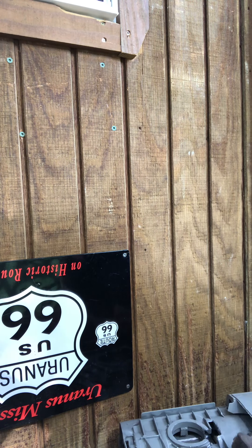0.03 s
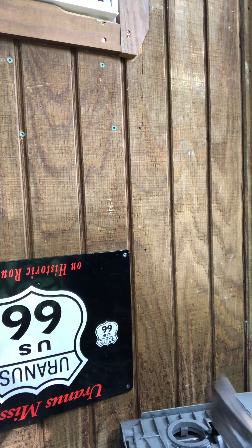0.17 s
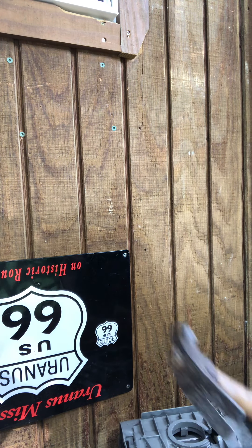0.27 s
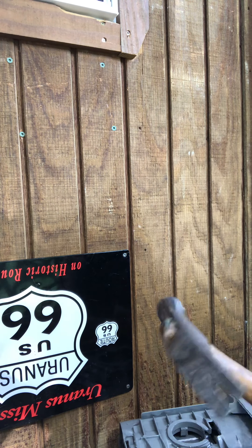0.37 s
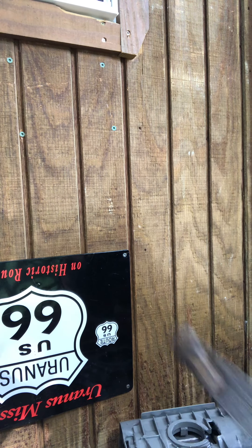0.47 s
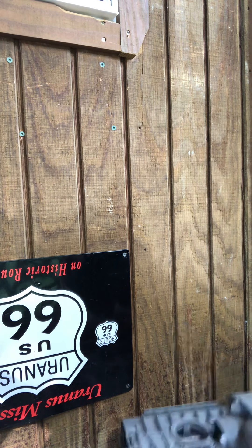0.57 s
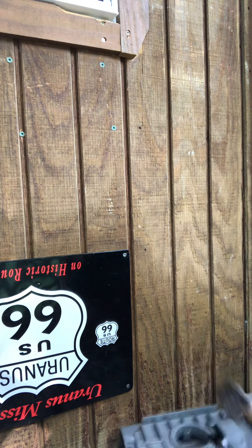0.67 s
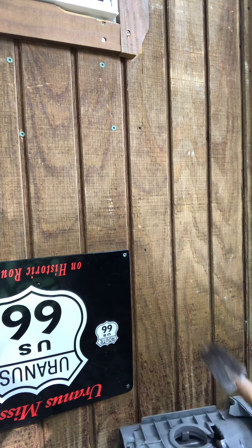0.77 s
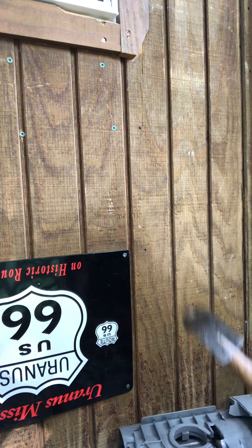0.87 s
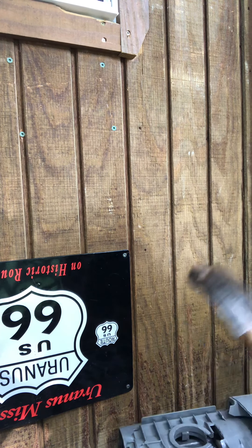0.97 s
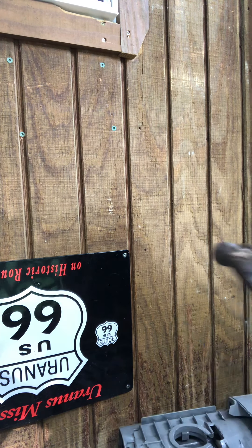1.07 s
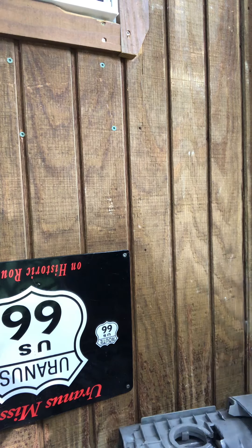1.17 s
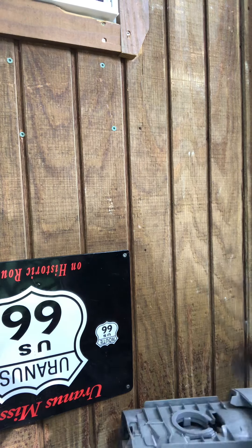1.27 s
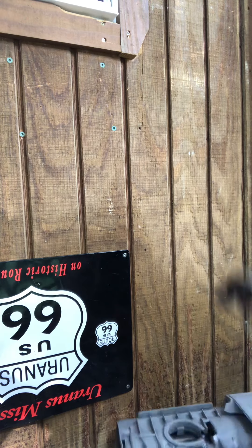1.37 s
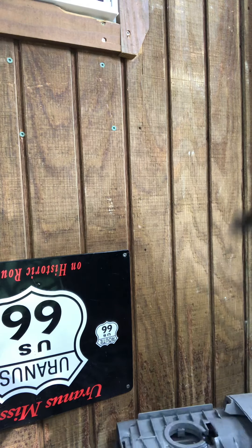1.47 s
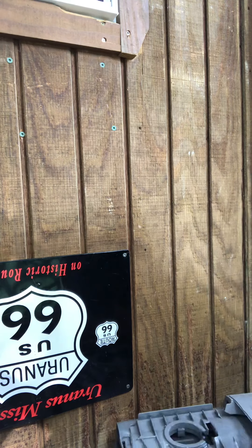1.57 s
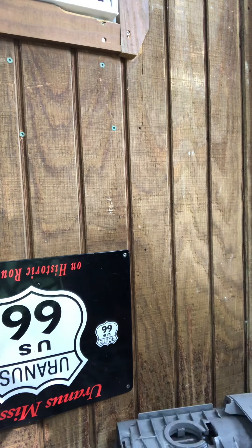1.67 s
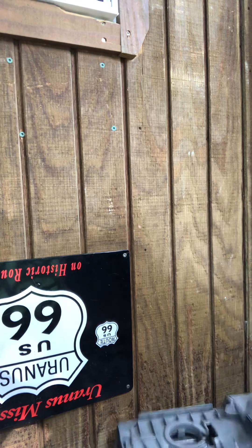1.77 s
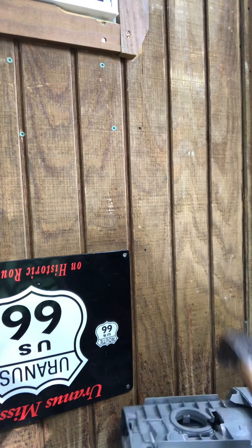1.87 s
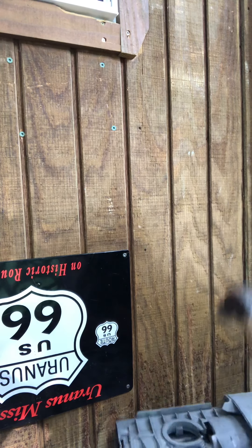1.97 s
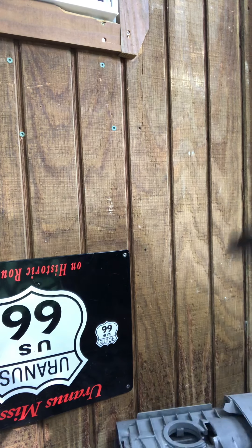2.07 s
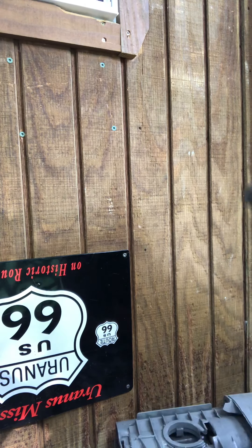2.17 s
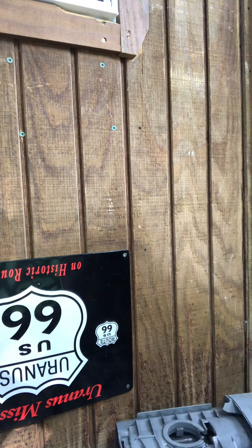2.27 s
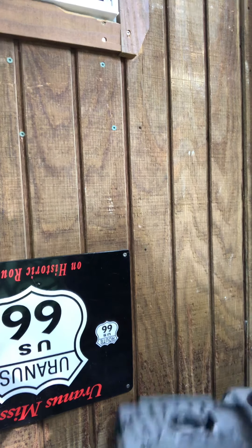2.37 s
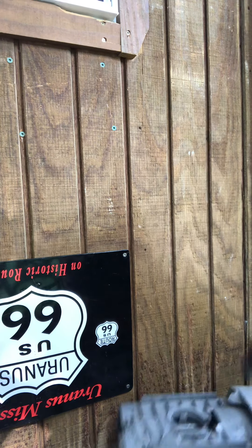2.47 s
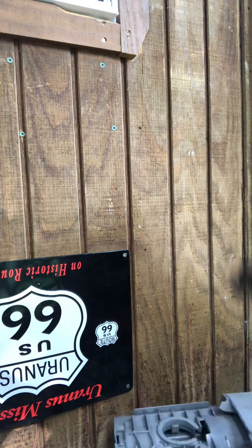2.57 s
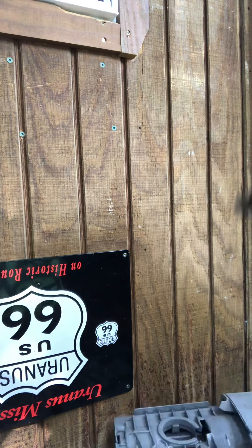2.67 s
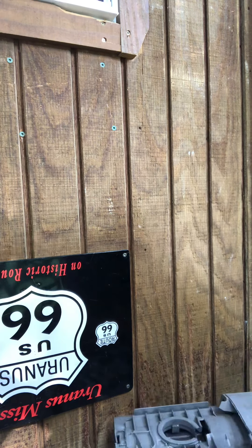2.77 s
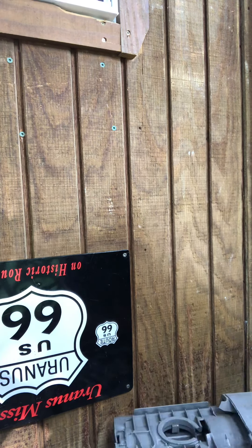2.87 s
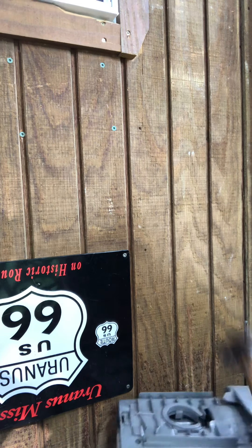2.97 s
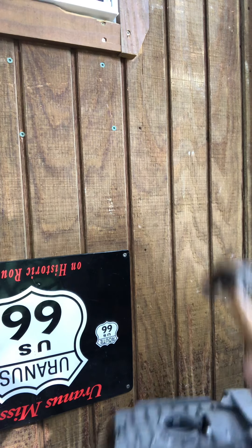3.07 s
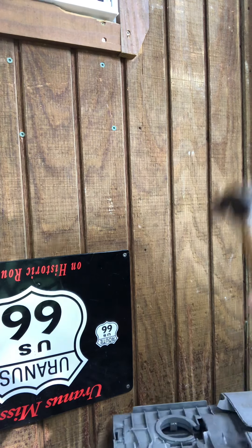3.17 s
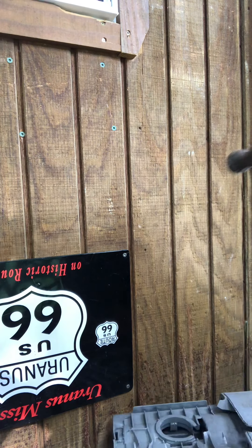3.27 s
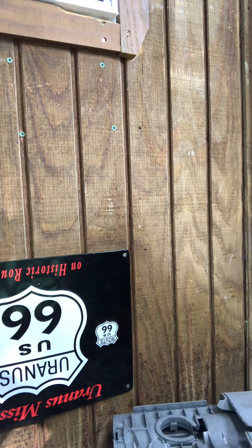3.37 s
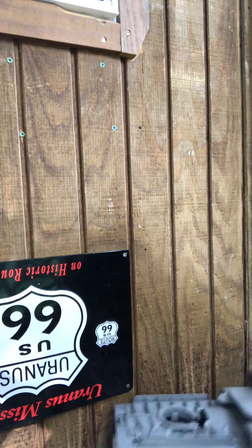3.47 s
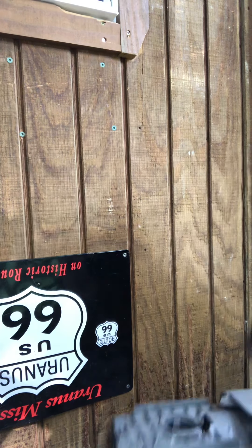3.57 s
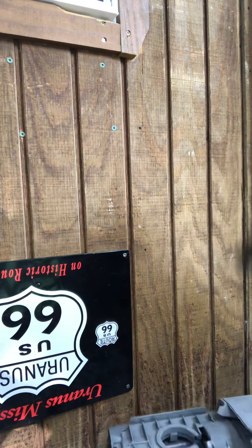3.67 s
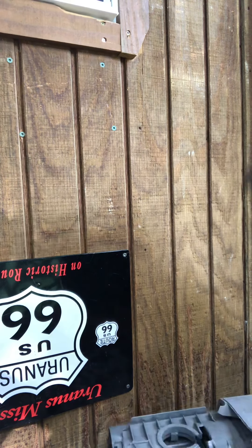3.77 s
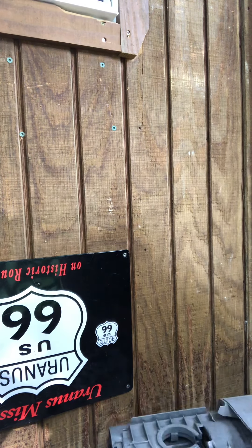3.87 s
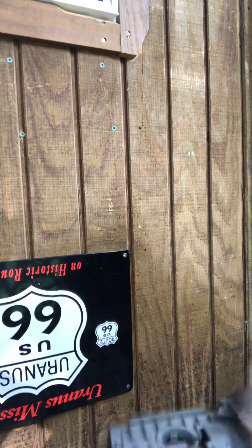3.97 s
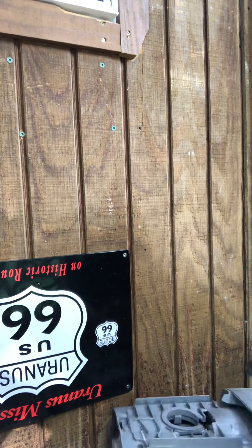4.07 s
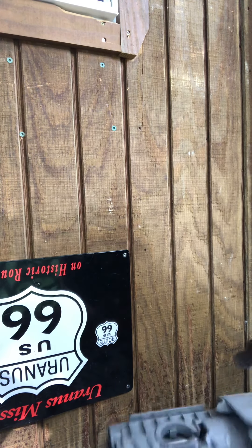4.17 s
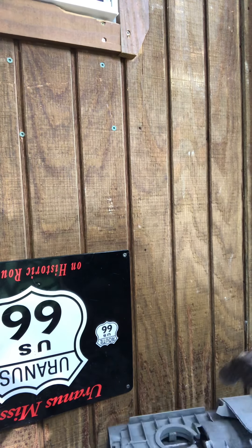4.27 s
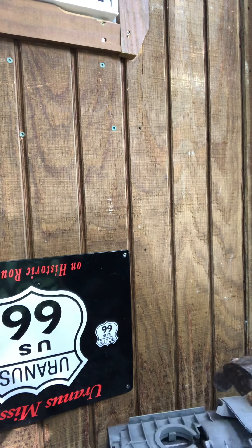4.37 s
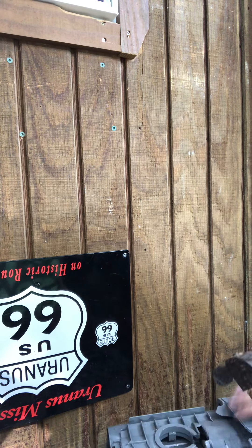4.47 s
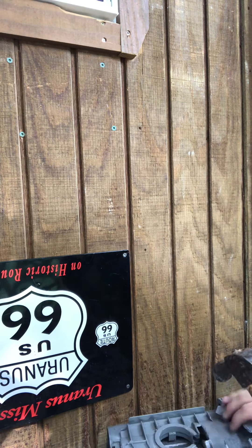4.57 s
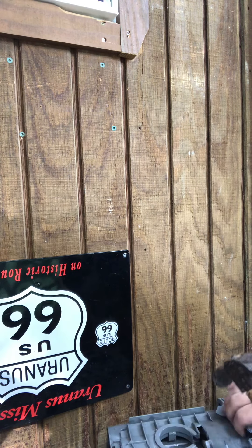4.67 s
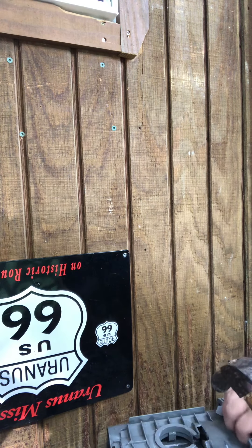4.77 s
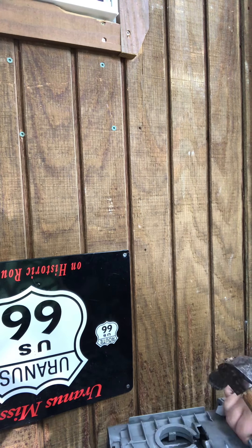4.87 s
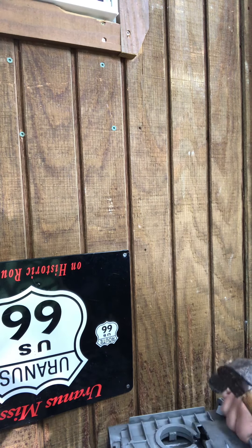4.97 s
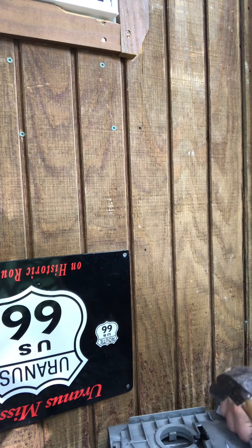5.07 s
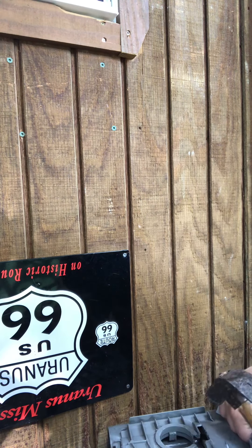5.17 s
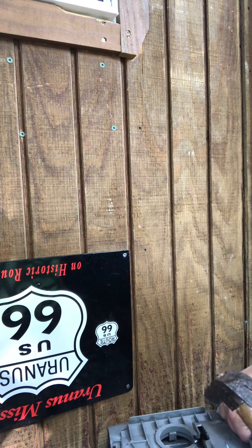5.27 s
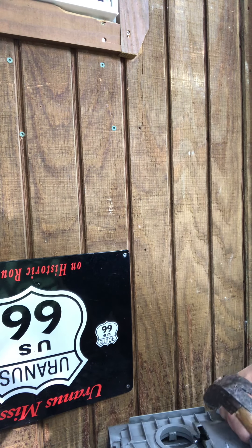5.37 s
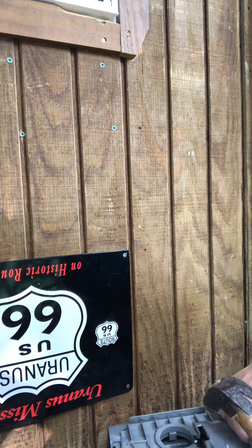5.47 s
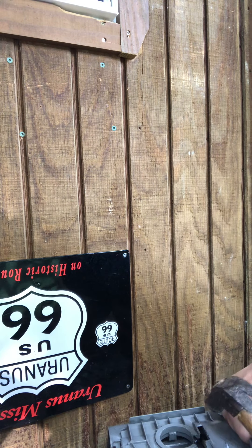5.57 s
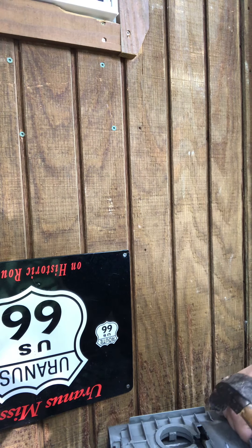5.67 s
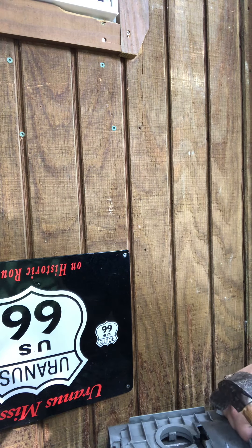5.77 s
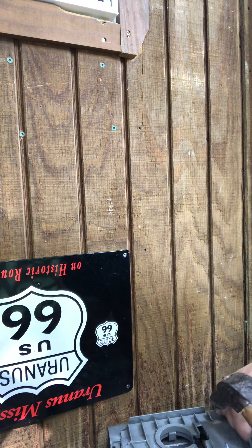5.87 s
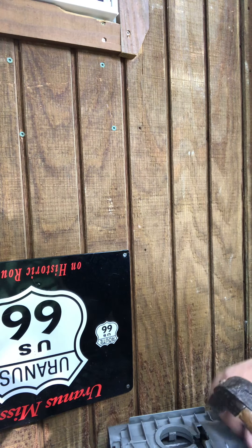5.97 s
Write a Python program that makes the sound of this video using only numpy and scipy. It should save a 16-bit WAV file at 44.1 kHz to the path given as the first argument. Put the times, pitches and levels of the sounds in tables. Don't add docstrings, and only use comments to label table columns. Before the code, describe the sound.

Faint road rumble and hiss open the scene, then loud steel-on-plastic blows begin, seven in fairly even rhythm. The hollow casing snaps, chatters on the boards and clatters down between hits, loose bits rattling inside. After the last, the hammer clinks down and quiet scuffs, taps and small squeaks follow. Dry, close phone microphone within arm's reach; the background dips under the blows, with tiny bird chirps and a distant motor.

```python
import sys
import numpy as np
from scipy import signal
from scipy.fft import rfft, irfft, next_fast_len
from scipy.io import wavfile
from scipy.ndimage import uniform_filter1d, map_coordinates

SR = 44100
rng = np.random.default_rng(int(sys.argv[2]) if len(sys.argv) > 2 else 0)


def wrap_up_sound(samples):
    columns = np.atleast_2d(samples).T
    tamed = np.clip(columns, -1, 1)
    steps = np.round(tamed * 32767).astype(np.int16)
    wavfile.write(sys.argv[1], SR, steps)


def amplitude_ratio(level_db):
    exponent = np.asarray(level_db, float) / 20
    return 10 ** exponent


N = 265923


def unit(x):
    return x / np.sqrt(np.mean(x ** 2) + 1e-20)


def along(points, hz):
    f, v = np.transpose(points)
    return np.interp(np.log(hz + 1), np.log(f + 1), v)


def curves(rows):
    s, *cols = np.transpose(rows)
    return [np.interp(np.arange(N) / SR, s, c) for c in cols]


def filtered(x, response):
    m = next_fast_len(len(x) + 4096)
    return irfft(rfft(x, m) * response(np.fft.rfftfreq(m, 1 / SR)), m)[:len(x)]


def colour(points):
    return lambda hz: amplitude_ratio(along(points, hz))


def modes(peaks):
    def response(f):
        total = 0
        for k, (centre, width, db) in enumerate(peaks):
            damping = 1j * f * width
            total = total + (-1) ** k * amplitude_ratio(db) * damping / (centre * centre - f * f + damping)
        return total
    return response


def noise_through(size, response):
    return unit(filtered(rng.standard_normal(size), response))


def grit(size, lumpy_db, rate):
    knots = rng.standard_normal(int(size * 2000 / SR) + 4)
    places = np.arange(size) * min(rate, 2000) / SR
    strength = amplitude_ratio(lumpy_db * map_coordinates(knots, [places], order=1))
    return unit(strength * rng.standard_normal(size))


def even(x, span):
    return x / np.sqrt(np.abs(uniform_filter1d(x ** 2, size=round(span * SR))) + 1e-12)


def add(out, s, piece):
    out[round(s * SR):][:len(piece)] += piece


# f/Hz, delay/ms
DELAY_MS = [(60, 25), (350, 7), (1000, 2.5), (2000, .4), (4000, 0)]


def late(hz, share=1):
    delay_s = share * along(DELAY_MS, hz) / 1000
    return np.exp(-2j * np.pi * np.cumsum(delay_s) * hz[1])


# f/Hz, width/Hz, level/dB
BODY = [(710, 60, 1), (860, 60, 2), (1090, 70, 5), (1390, 70, 3), (1580, 50, 3), (1890, 70, 3),
        (2390, 90, 2), (2820, 100, 2), (3250, 130, 1), (3750, 130, 0), (4250, 160, 0), (4920, 200, 1),
        (5750, 200, 0), (6800, 250, -1)]


def walls(tone, scatter_db):
    woken = [(c * rng.normal(1, .03), w, db - 3 + rng.normal(0, scatter_db)) for c, w, db in BODY]
    return lambda hz: colour(tone)(hz) * (1 + modes(woken)(hz))


# f/Hz, level/dB per Hz
RUMBLE = [(20, -40.5), (40, -16.5), (52, -3), (59, 6), (66, -9), (110, -13.5), (150, -12), (200, -55)]
ROAD = [(59, -26.5), (110, 1.5), (160, -1), (264, -1.5), (399, -13), (560, -15), (700, -13), (813, -8.5),
        (937, -9), (1060, -6), (1150, -10), (1300, -13.5), (2200, -21), (2860, -46.5), (4840, -120)]
HISS = [(880, -39), (1500, -15.5), (2160, -19), (2740, -15.5), (4970, -22.5), (6060, -28), (8000, -33.5),
        (15000, -46), (16200, -53)]
# level at full gain/dB, share of the gain change
STREET_LAYERS = [
    (-59, 0.2),
    (-39.5, 0.91),
    (-55, 0.7),
]
# depth/dB, lumps per s
STREET_LUMPS = [
    (2, 8),
    (.8, 30),
    (.8, 40),
]
# t/s, level/dB
GAIN = [(0, -1.5), (.56, -1.5), (.75, -13.5), (1.15, -16.5), (2.85, -19), (3.9, -21.5), (4.5, -22),
        (5, -23.5), (5.5, -25), (6.03, -16.5)]
# t/s, level/dB
WHINE_DB = [(0, -66.5), (.6, -73), (2, -79), (4.5, -75), (4.95, -69.5), (5.3, -67.5), (5.7, -62),
            (5.92, -62.5), (6.03, -62.5)]


def street():
    gain_db, whine_db = curves(GAIN)[0], curves(WHINE_DB)[0]
    layers = []
    for tone, (db, share), (lumpy_db, rate) in zip((RUMBLE, ROAD, HISS), STREET_LAYERS, STREET_LUMPS):
        noise = unit(filtered(grit(N, lumpy_db, rate), colour(tone)))
        layers.append(amplitude_ratio(db + share * gain_db) * noise)
    rumble, road, hiss = layers
    swell = amplitude_ratio(0.41 * (whine_db - whine_db.mean()))
    return swell * rumble + road + hiss


# f/Hz, width/Hz, level/dB
WHINE = [(2170, 70, 0), (5150, 70, -8), (6190, 120, -14)]


def motor():
    t = np.arange(N) / SR
    tone_hz, beat_hz, beat_depth = 2169, 76.6, .9
    waver = unit(uniform_filter1d(rng.standard_normal(N), size=600))
    tone = np.sin(2 * np.pi * tone_hz * t + .5 * waver)
    beat = 1 + beat_depth * np.sin(2 * np.pi * beat_hz * t + waver[::-1])
    return amplitude_ratio(curves(WHINE_DB)[0]) * (tone * beat + .42 * noise_through(N, modes(WHINE)))


# middle t/s, length/s, f/Hz, level/dB
CHIRPS = [(.95, 0.18, 5120, -77.5), (1.117, .07, 4330, -66), (1.091, .04, 5000, -69.5),
          (1.7, 0.12, 4250, -66), (3.31, 0.18, 7420, -76), (3.36, .1, 6150, -75), (3.306, 0.034, 4700, -72),
          (3.374, .08, 5150, -79), (4.797, 0.077, 3420, -64), (4.849, 0.026, 3400, -62),
          (4.765, 0.037, 1400, -57), (4.92, .025, 1850, -53.5), (5.086, .025, 1880, -59),
          (5.185, 0.021, 2850, -62), (5.534, 0.032, 2800, -73), (5.795, .04, 2790, -62),
          (5.93, 0.055, 1870, -58), (5.976, 0.028, 2730, -50.5)]


def chirps():
    out, t = 0, np.arange(N) / SR
    waver = unit(uniform_filter1d(rng.standard_normal(N), size=300))
    for s, length, hz, db in CHIRPS:
        swell = np.exp(-(2 * (t - s) / length) ** 2)
        out = out + amplitude_ratio(db) * swell * np.sin(2 * np.pi * hz * t + 1.3 * waver)
    return out


def bits():
    per_s, life_s, spread_db, bed = 160, .004, 2, 2.2
    starts = (rng.random(N) < per_s / SR) * amplitude_ratio(spread_db * rng.standard_normal(N))
    return unit(bed + signal.lfilter([1], [1, -np.exp(-1 / (life_s * SR))], starts))


STRIKES = [.5674, 1.2071, 1.7923, 2.3527, 2.9257, 3.4493, 3.9909]
# level/dB, time until the casing lies still/s
LOOSE = [
    (-46.5, 0.086),
    (-52, 0.31),
    (-47.5, 0.19),
    (-51.5, 0.26),
    (-47.5, 0.23),
    (-53.5, 0.25),
    (-52, 0.42),
]
# t/s, level/dB
HAND = [(4.5, -63.5), (4.68, -75), (4.74, -60), (4.85, -61), (4.89, -64.5), (5.3, -66), (5.72, -61),
        (5.93, -60), (5.985, -48.5), (6.03, -56)]
# f/Hz, level/dB per Hz
BITS = [(600, -21.5), (1500, 0.5), (3000, -3), (5000, -8.5), (7800, -14.5), (8600, -22), (15500, -32.5),
        (16200, -55)]
SCUFF = [(500, -2), (1200, 0), (3400, -3.5), (5000, -8.5), (7800, -15), (8600, -20.5), (15500, -22),
         (16200, -60)]
# f/Hz, width/Hz, level/dB
HOLLOW = [(276, 50, -0.5), (377, 40, 6.5), (519, 81, -5)]
# f/Hz, width/Hz, level/dB
BOARDS = [(62, 2.2, 3), (95, 7.6, -2.5), (190, 27, -5)]


def rustle():
    t = np.arange(N) / SR
    fine_fall, dull_fall, still_fall = 47, 8, 84
    hand = (t > HAND[0][0]) * amplitude_ratio(curves(HAND)[0])
    fine_gain, dull_gain = 0, hand * amplitude_ratio(-3.5)
    for s, (db, moving) in zip(STRIKES, LOOSE):
        since = np.maximum(t - s, 0)
        shaken = (t > s) * amplitude_ratio(db - still_fall * np.maximum(since - moving, 0))
        fine_gain = fine_gain + shaken * amplitude_ratio(-fine_fall * (since - 0.2516))
        dull_gain = dull_gain + shaken * amplitude_ratio(2 - dull_fall * since)
    chatter = grit(N, lumpy_db=2.6, rate=220)
    fine = unit(filtered(chatter, colour(BITS)))
    skin = unit(filtered(chatter, colour(SCUFF)))
    dull = unit(filtered(grit(N, lumpy_db=2.5, rate=150), modes(HOLLOW + BOARDS[2:])))
    return fine_gain * bits() * fine + hand * bits() * skin + dull_gain * dull


# f/Hz, level/dB, t60/s
STEEL = [(1580, -6, .13), (2350, -6, .13), (3300, -9, .12), (4300, -11, .1), (5350, -5.5, .11),
         (6260, -5.5, .13), (6950, -9, .1), (8600, -11, .09), (9500, -12, .09), (10180, -11, .09),
         (10800, -10, .09), (12460, -11, .08), (13360, -11, .08), (13950, -12, .09)]
# f/Hz, level/dB per Hz
TOUCH = [(300, -22), (1000, 0), (2500, -7.5), (6000, -10), (8000, -15), (8400, -16), (14500, -14),
         (15500, -34)]
# t/s, peak level/dB
SET_DOWN = [
    (4.367, -23.5),
]


def steel():
    out, t = np.zeros(N + SR), np.arange(SR // 3) / SR
    for s, db in SET_DOWN:
        ring = 0
        for hz, level, t60 in STEEL:
            partial = np.sin(2 * np.pi * hz * t)
            partial = partial + 0.14 * np.sin(2.014 * np.pi * hz * t) + 0.34 * np.sin(2.17 * np.pi * hz * t)
            ring = ring + amplitude_ratio(level - 60 * t / t60) * partial
        scrape = 1.6 * amplitude_ratio(-60 * t / .09) * noise_through(len(t), colour(TOUCH))
        board = amplitude_ratio(-5 - 60 * t / 0.16) * noise_through(len(t), modes(HOLLOW + BOARDS[2:]))
        onset = 1 - np.exp(-t / 0.0032)
        add(out, s, amplitude_ratio(db - 6.5) * onset * (ring + scrape + board))
    return out[:N]


def rung(peaks, t):
    off = rng.standard_normal((len(peaks), 3))
    tones = 0
    for (hz, _, db), (louder, sharper, phase) in zip(peaks, off):
        tones = tones + amplitude_ratio(db + 2 * louder) * np.sin(2 * np.pi * hz * (1 + .03 * sharper) * t + phase)
    return unit(unit(tones) + .6 * noise_through(len(t), modes(peaks)))


# t/s, peak level/dB, hollow/dB re peak, panel/dB re peak
LANDINGS = [(0.4637, -33, 0, -10.5), (0.6927, -18, 8, 6), (1.2806, -35, -10, -16), (1.3754, -22.5, 1.5, -1),
            (1.3858, -17, -11, 8.5), (1.3955, -15.5, 4, 3), (1.4556, -26.5, 0.5, -1), (1.9163, -28, -15, 2),
            (1.9816, -18.5, 4, 1.5), (2.0563, -32.5, 6, -1), (2.0999, -38, 6.5, -4), (2.4494, -31, -13, 10),
            (2.542, -15, 2.5, 5.5), (2.577, -31.5, 9.5, 6.5), (3.0202, -25.5, -3, 1), (3.1148, -16, 5, 5),
            (3.138, -26.5, -5, 6.5), (3.62, -25.5, 1, 0), (3.6478, -14.5, 2, 3.5), (4.1857, -18, 1, 2.5),
            (4.2207, -23, 5, 9.5), (4.2388, -24.5, 6, 9)]
THUDS = [
    (1.4212, -34.5, 15.5, 13),
    (1.9993, -31.5, 17.5, 12.5),
    (3.5847, -37, -9, 11),
    (3.6713, -27.5, 9.5, -2),
    (4.2009, -18, 4, -7),
    (4.3322, -20, 2, -4),
]
NUDGES = [(.8444, -44, -37.5, -14), (.9365, -40, 2, 4), (1.157, -39, 3.5, -7), (1.6542, -41.5, 7, -1),
          (2.1828, -44, -7, 9), (2.751, -42, 7, 1), (3.191, -61, -8, -19), (3.2094, -47.5, -10, 15),
          (3.3276, -50, 12.5, 16), (3.707, -47.5, 9, -16), (4.3064, -43, -6, 3), (4.5154, -42, 4.5, 10),
          (4.527, -43, -1, -6), (4.605, -48, -12.5, 10), (4.736, -54, -7.5, -2), (4.7695, -48, -14.5, 4.5),
          (4.839, -46, -22, -17), (4.9153, -45, 10.5, 0), (4.9388, -36, -7, 4.5), (5.075, -46.5, 10.5, 10),
          (5.092, -46.5, 11.5, 4), (5.1803, -43, 4.5, 10), (5.535, -51.5, -8, 7.5),
          (5.672, -34.5, 2.5, -1.5), (5.7869, -43.5, -12, -10.5), (5.871, -46, 13.5, -12),
          (5.9502, -50, -4.5, 15), (5.978, -49.5, -3, 0)]
# t/s, peak level/dB, bright/dB re peak, t60/s
RATTLES = [(0.65, -15, -8, 0.087), (0.7065, -16, -13, 0.15), (0.79, -34, -9, 0.081), (1.339, -32, -5, .06),
           (1.3507, -26, -19, 0.18), (1.487, -38.5, 7.5, 0.08), (1.502, -38, 0, 0.13),
           (1.544, -47, 0, 0.038), (1.58, -57, 1, 0.045), (1.7512, -34, -10, 0.21), (1.8915, -25, -8, 0.18),
           (1.936, -37, -15, .06), (2.012, -29, -8, 0.065), (2.068, -39, -12, .06),
           (1.953, -36, -16, 0.076), (2.379, -2, -12, .05), (2.48, -34, -8, 0.055),
           (2.489, -26.5, -13, 0.14), (2.615, -35, -11, 0.22), (2.6494, -34.5, -12, 0.061),
           (2.668, -41.5, 2, 0.12), (2.774, -35, -16, 0.2), (2.8773, -28.5, -20, 0.16),
           (3.059, -25.5, -6, 0.1), (3.0936, -24, -30, 0.04), (3.159, -26.5, -1, 0.17),
           (3.255, -35.5, -24, 0.078), (3.5608, -40, -19, .06), (3.627, -24, -13, 0.11),
           (3.665, -38, 1, .1), (3.7084, -39, -2, 0.1), (3.728, -38.5, -5, 0.21),
           (3.813, -58.5, -5.5, .044), (3.8344, -50, 4, 0.087), (4.0794, -43, 10, .05),
           (4.114, -32, -15, 0.16), (4.136, -28.5, -33, 0.24), (4.258, -34, -1, 0.094),
           (4.2894, -45, 5, .06), (5.1419, -45, -1.5, 0.077)]


def contacts():
    hollow_db, panel_db = -5.5, 1.5
    flat = [(*row, -10.5, 0.17) for row in LANDINGS]
    padded = [(*row, -17.5, 0.17) for row in THUDS]
    edge = [(s, db, hollow_db, panel_db, bright, t60) for s, db, bright, t60 in RATTLES]
    soft = [(*row, -25, 0.1) for row in NUDGES]
    return flat + padded + edge + soft


# f/Hz, level/dB per Hz
RIBS = [(1200, -12.5), (1800, 0), (3400, -4.5), (4800, -4.5), (6500, -14.5), (8000, -29.5)]
EDGES = [(4000, -21.5), (5500, -1), (8000, -5.5), (8300, -13.5), (15500, -16), (16200, -61.5)]
# f/Hz, width/Hz, level/dB
PANEL = [(620, 34, -2), (840, 250, -3.5), (980, 130, 2), (1420, 100, -9.5)]


def knocks():
    out, t = np.zeros(N + SR), np.arange(SR // 5) / SR
    sudden = 1 - np.exp(-t / .0004)
    for s, db, hollow_db, panel_db, bright_db, t60 in contacts():
        ribs = even(filtered(rng.standard_normal(len(t)), walls(RIBS, scatter_db=2)), span=.012)
        edges = even(filtered(rng.standard_normal(len(t)), colour(EDGES)), span=.012)
        noises = [ribs, rung(HOLLOW, t), rung(PANEL, t), edges]
        levels = db - 14.5 + np.array([0, hollow_db, panel_db, bright_db])
        lives = max(t60, .01) * np.array([0.48, 0.5, 0.37, 0.25])
        burst = 0
        for level, life, noise in zip(levels, lives, noises):
            burst = burst + amplitude_ratio(level - 60 * np.maximum(t - .002, 0) / life) * noise
        add(out, s - .001, filtered(burst * sudden, lambda hz: late(hz, share=.6)))
    return out[:N]


# f/Hz, level/dB per Hz
CRACK = [(120, -35), (200, -11), (1210, 1.5), (2700, -1.5), (3310, -2.5), (5630, -6), (7270, -9.5),
         (7830, -4.5), (8740, -12.5), (13800, -14), (16000, -26.5)]
# start t/s, noise level/dB, 8 kHz tone/dB, deep noise/dB
LEAD_INS = [
    (0.546, -38.5, -33, -34.5),
    (1.185, -44, -44.5, -48),
    (1.772, -41.5, -32.5, -58.5),
    (2.33, -44, -32.5, -34),
    (2.904, -44.5, -46, -43.5),
    (3.428, -40.5, -34, -39.5),
    (3.968, -45.5, -35.5, -46.5),
]


def forerunners():
    out = np.zeros(N + SR)
    for (s, db, ring_db, deep_db), blow in zip(LEAD_INS, STRIKES):
        t = np.arange(SR // 10) / SR - (blow - s)
        flat = amplitude_ratio(db + 43 * t) * noise_through(len(t), colour(CRACK))
        deep = amplitude_ratio(deep_db + 420 * t) * noise_through(len(t), modes(HOLLOW[1:] + PANEL))
        fade = np.where(t < 0, 900 * t - 4, -60 * t / .035)
        ring = amplitude_ratio(ring_db + fade) * np.sin(2 * np.pi * 8040 * t)
        add(out, s, (t < 0) * (flat + deep) + ring)
    return out[:N]


def crack(t, db, brief, spot):
    sudden = 1 - np.exp(-t / .0002)
    snap = amplitude_ratio(db + 3.5 - 60 * t / 0.0065) * noise_through(len(t), colour(EDGES))
    fracture = grit(len(t), lumpy_db=2, rate=900)
    broad = unit(filtered(fracture, walls(CRACK, scatter_db=1)))
    local = amplitude_ratio(-6.5) * unit(filtered(fracture, modes(spot)))
    fall = amplitude_ratio(db - 60 * np.maximum(t - brief, 0) / 0.044 - 460 * t)
    burst = sudden * (snap + even(broad + local, span=.004) * fall)
    ring = 0
    for hz, width, level in spot:
        ring = ring + amplitude_ratio(level) * np.exp(-np.pi * width * t) * np.sin(2 * np.pi * hz * t)
    return filtered(burst + amplitude_ratio(db - 1.5) * ring, lambda hz: late(hz, share=.45))


# f/Hz, level/dB per Hz
SHUDDER = [(80, -33.5), (110, -4), (160, -11.5), (260, -9.5), (330, -10), (684, -5.5), (1100, -6),
           (1700, -7.5), (3050, -11), (5000, -13.5), (7820, -16.5), (8400, -21.5), (13900, -24.5),
           (16000, -36)]


def shudder(t, shake_db, boom_db, hold, seat, swing, settling):
    chatter = grit(len(t), lumpy_db=2, rate=590)
    broad = unit(filtered(chatter, walls(SHUDDER, scatter_db=1)))
    local = amplitude_ratio(-8) * unit(filtered(chatter, modes(seat)))
    shake = amplitude_ratio(shake_db) * even(broad + local, span=.012)
    boom = amplitude_ratio(boom_db) * even(filtered(rng.standard_normal(len(t)), modes(HOLLOW)), span=.03)
    dull = filtered(shake, lambda hz: 1 / (1 + 1j * hz / 4000) ** 2)
    darkening = dull + (shake - dull) * np.exp(-(t / 0.18) ** 2)
    pressed = settling * amplitude_ratio(-60 * np.maximum(t - hold, 0) / 0.14)
    after = settling * amplitude_ratio(-25 - 60 * t / 0.27) * (dull + 4.3 * boom)
    return pressed * (0.83 + 0.31 * swing) * (darkening + boom) + after


def bench(t, thump_db, swing, settling):
    thump = amplitude_ratio(thump_db) * swing * np.sin(2 * np.pi * 62 * t + 3.7)
    hum = settling * amplitude_ratio(thump_db - 7.0 - 60 * t / .5) * noise_through(len(t), modes(BOARDS))
    return thump + hum


# crack/dB, crack length/s, shudder/dB, hollow boom/dB, bench thump/dB
BLOWS = [
    (-9, 0.013, -20.5, -24.5, -28),
    (-10.5, .015, -20, -23, -19),
    (-8, 0.0091, -17, -25, -17),
    (-10, 0.0091, -18.5, -22.5, -21.5),
    (-8.5, 0.0039, -14.5, -18, -15.5),
    (-8.5, 0.0062, -17, -20, -17.5),
    (-7, 0.0052, -17, -18, -17),
]
# f/Hz, width/Hz, level/dB
SPOTS = [
    [(339, 170, -4.5), (1200, 44, -0.5), (3330, 46, -6.5), (5200, 370, -0.5), (5930, 110, -13)],
    [(900, 40, -8), (2840, 150, 5.5), (3850, 120, 1), (5080, 260, -2), (5640, 160, -11.5)],
    [(1380, 43, -13.5), (2830, 160, -1.5), (3670, 160, -4), (4540, 120, 0.5), (7200, 320, -5.5)],
    [(480, 110, 5), (1780, 83, 0), (4010, 89, -5.5), (5200, 140, 0.5), (5720, 240, -20.5)],
    [(1890, 120, -1), (2540, 200, 3.5), (4370, 140, -6.5), (5700, 71, -9), (5500, 81, -10.5)],
    [(463, 150, -3), (910, 110, 4.5), (2100, 120, -11), (4030, 110, 2), (5010, 220, -9.5)],
    [(1130, 97, 4.5), (2560, 150, -5.5), (3760, 96, -6), (4150, 100, -5), (5394, 74, -12)],
]
# f/Hz, width/Hz, level/dB
SEATS = [
    [(1170, 57, -1.5), (2310, 27, -6.5), (3510, 32, -6.5), (3900, 54, -5.5)],
    [(2330, 14, -0.5), (2650, 37, -2.5), (3278, 98, -9.5), (4000, 160, -4.5)],
    [(1550, 29, -3), (2020, 100, 3.5), (3270, 31, -9), (4730, 46, -3.5)],
    [(1082, 19, 0), (2725, 58, -2), (4480, 39, -5), (4700, 41, -11)],
    [(1230, 430, -1.5), (1370, 110, 10), (3500, 51, -9.5), (4330, 48, -10)],
    [(2484, 13, -2.5), (3290, 150, 1), (4910, 92, -10.5), (4670, 30, -8.5)],
    [(2070, 83, -4.5), (2660, 29, 6), (3276, 40, -2), (3550, 130, -1.5)],
]


def hammer():
    out, t = np.zeros(N + SR), np.arange(SR // 2) / SR
    settling = 1 - np.exp(-(t / .012) ** 2)
    swing = np.exp(-((t - .043) / 0.016) ** 2)
    for s, blow, spot, seat in zip(STRIKES, BLOWS, SPOTS, SEATS):
        db, brief, shake_db, boom_db, thump_db = blow
        hold = 0.018 + 2.2 * brief
        add(out, s, crack(t, db, brief, spot))
        add(out, s, shudder(t, shake_db, boom_db, hold, seat, swing, settling))
        add(out, s, bench(t, thump_db, swing, settling))
    return out[:N]


def scene():
    background = street() + motor() + chirps()
    casing = rustle() + knocks()
    blows = forerunners() + hammer()
    return (background + casing + steel() + blows)[None]


def top_cut(x):
    return signal.sosfilt(signal.butter(12, 17000, fs=SR, output="sos"), x)


def record(dry):
    held = dry / (1 + np.abs(dry / .9) ** 5) ** (1 / 5)
    edge = filtered(held[0], colour([(15000, 0), (16000, -3), (16600, -22), (17000, -60)]))
    return top_cut(edge[None])


dry = scene()
out = record(dry)
wrap_up_sound(out)
```